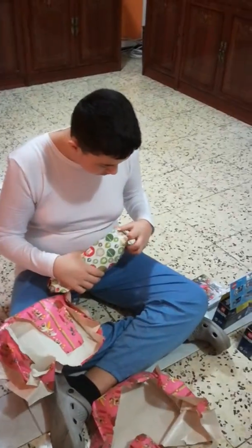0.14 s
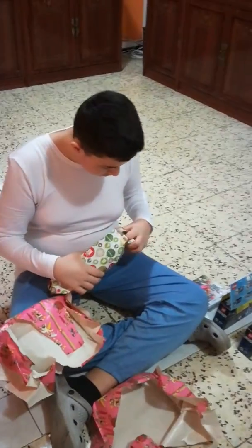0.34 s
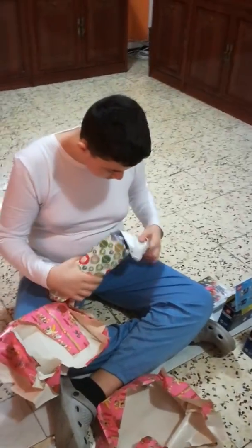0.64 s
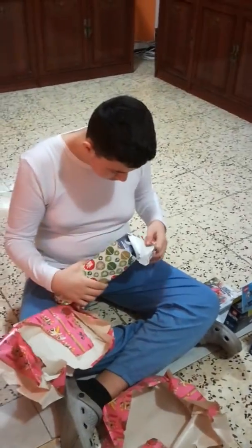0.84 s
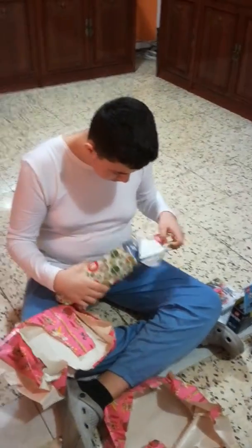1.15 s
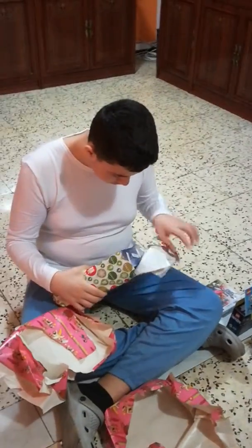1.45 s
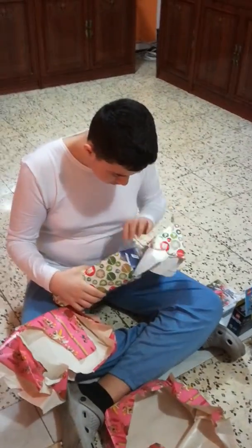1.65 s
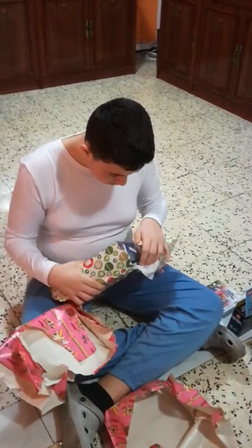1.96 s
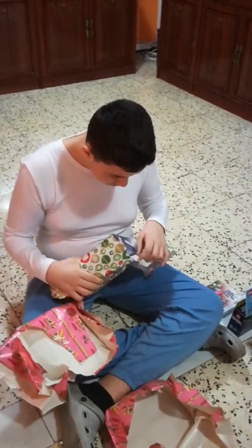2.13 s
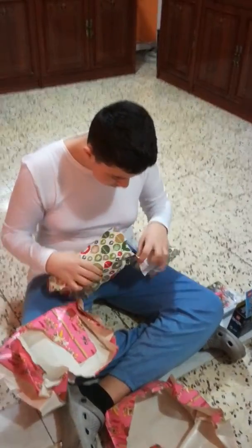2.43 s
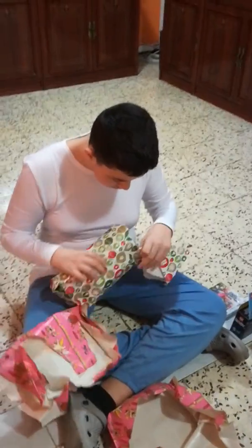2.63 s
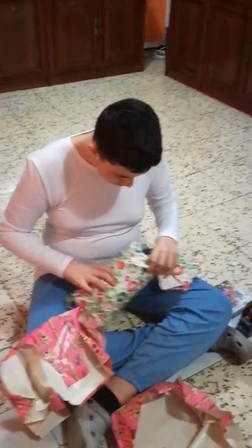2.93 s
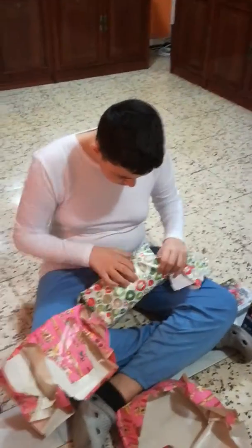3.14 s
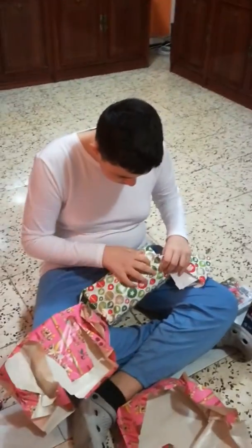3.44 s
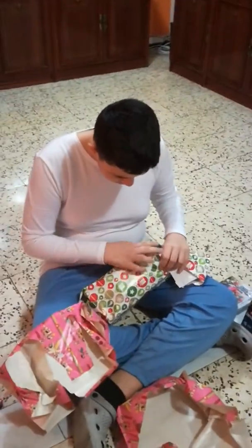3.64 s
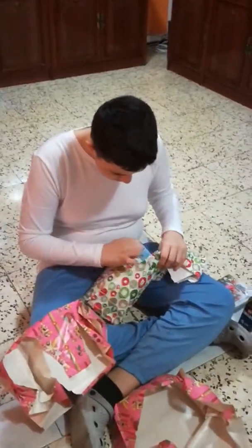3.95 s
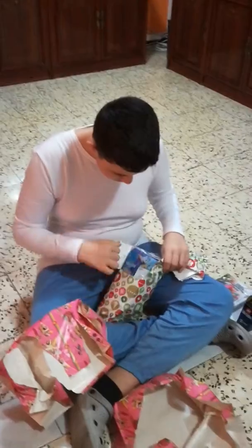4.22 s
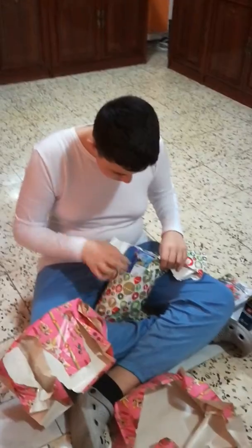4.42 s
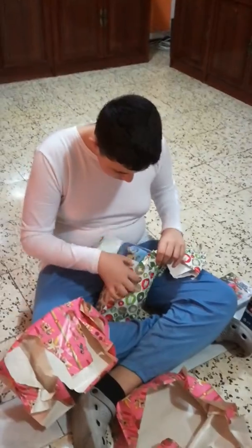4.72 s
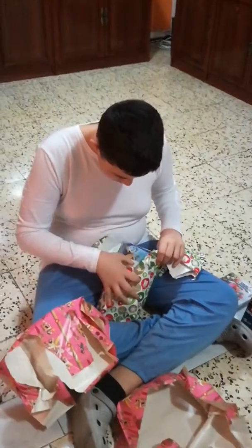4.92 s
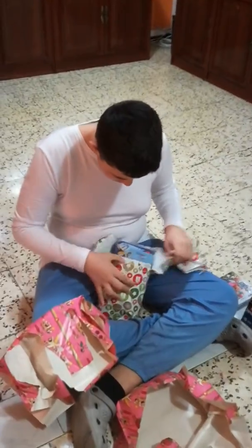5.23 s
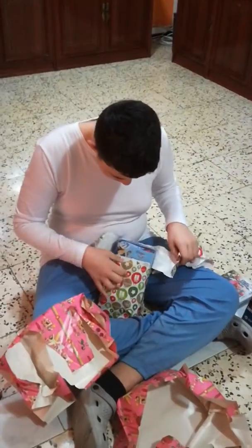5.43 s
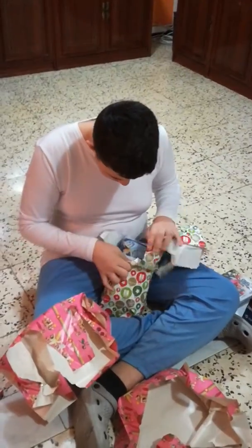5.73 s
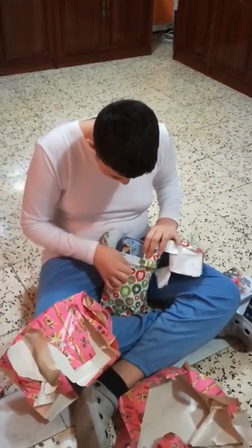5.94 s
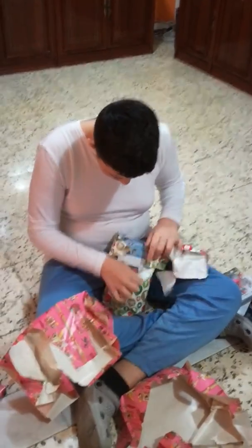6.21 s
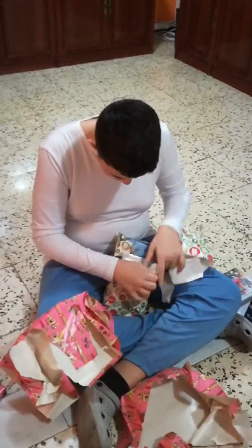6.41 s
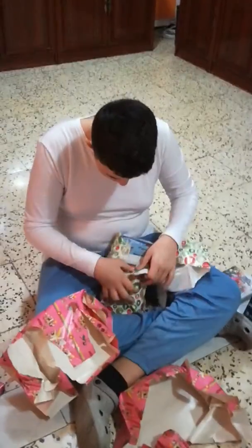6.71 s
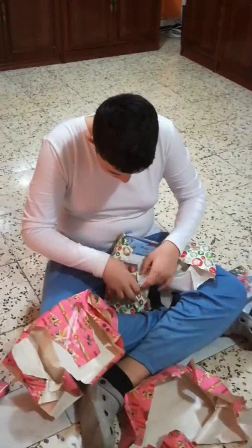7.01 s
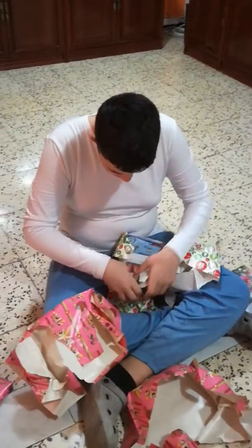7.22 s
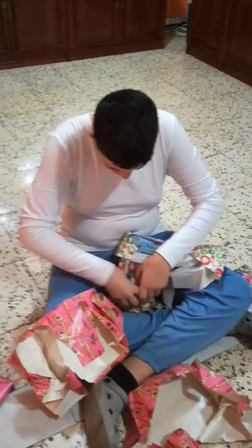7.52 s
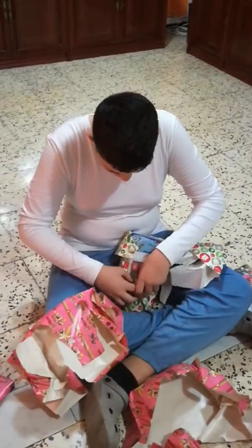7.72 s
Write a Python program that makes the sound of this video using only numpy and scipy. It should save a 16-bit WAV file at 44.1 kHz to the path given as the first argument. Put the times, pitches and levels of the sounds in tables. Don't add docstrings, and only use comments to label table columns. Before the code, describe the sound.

Glossy gift paper is opened by hand around a hollow carton, about a metre from a phone in a hard, tiled room. From 0 to 1.3 s, quick rips and squeezes give dense bright crackle, sharp fold snaps and dull creasing pops. After a brief dip near 1.5 s, moderate rustling continues, with crisp snaps around 2.4-2.6 s. It thins to small, papery, ringing pops near 3 s. At 3.6-4.0 s comes the loudest tearing and crumpling, with a hollow box rub and a soft low shift. Near-silence follows until 4.45 s, then a strong crumple around 4.9-5.2 s. Smaller picks and squeezes follow at 5.6-6.3 s and 6.7 s, a faint finger hiss near 6.9 s, a snap at 7.25 s, and a last cluster of popping folds around 7.75 s. Faint air hiss and hum remain beneath.

```python
import sys
import numpy as np
from scipy import signal
from scipy.fft import rfft, irfft, next_fast_len
from scipy.io import wavfile
from scipy.ndimage import map_coordinates

SR = 44100
rng = np.random.default_rng(int(sys.argv[2]) if len(sys.argv) > 2 else 0)


def elevation(decibels):
    levels = np.asarray(decibels, float)
    return 10 ** (levels / 20)


def output_pcm(signal):
    pcm = np.clip(np.atleast_2d(signal).T, -1, 1) * 32767
    wavfile.write(sys.argv[1], SR, np.round(pcm).astype(np.int16))


N = 346626

# frequency in Hz, density in dB per Hz.
AIR_SPECTRUM = [(20, -15), (50, -22), (120, -17), (260, -14.5), (520, -20.5), (850, -17), (3600, -19.5),
                (9000, -36.5), (16400, -43)]
# frequency in Hz, level in dB rms.
HUM_PARTIALS = [(100, -81.5), (197, -93), (297, -101)]
# frequency in Hz, T60 in seconds.
ROOM_T60 = [(200, 0.33), (1500, 0.46), (5000, 0.36), (14000, 0.074)]
# frequency in Hz, correlation from -1 to 1.
PORT_LIKENESS = [(80, 0.95), (290, 0.93), (640, -0.2), (1410, 0.32), (3100, 0.22), (6820, 0.29),
                 (15000, -0.26)]
# frequency in Hz, left lead in radians.
PORT_LEAD = [(300, 5.1), (600, 2.03), (1400, 7.67), (16000, 9.1)]
# frequency in Hz, left over right in dB.
PORT_BALANCE = [(100, 0), (380, .5), (700, 1), (1290, -4.5), (2380, -1.0), (4400, -3.5), (8120, -3.5),
                (15000, 6)]
# time in seconds, hold in seconds, level in dB.
SHIFTS = [
    (1.32, 0.034, -72),
    (3.94, 0.098, -65.5),
    (7.25, 0.058, -70),
]
# frequency in Hz, width in Hz, level in dB.
BOX_MODES = [
    (197, 185, -20),
    (307.3, 149, 1),
    (354, 1200, -18),
]
# full push in seconds, hold in seconds, drone in dB, rise in dB per s.
PRESSES = [(0.066, 0.22, -67.5, 98), (0.419, 0.017, -53, 59), (1.02, 0.28, -56, 90),
           (1.576, 0.52, -64.5, 587), (2.09, 0.13, -66, 61), (2.65, 0.024, -62, 76), (3.152, .03, -69, 64),
           (3.712, 0.022, -64, 113), (3.852, 0.14, -52, 138), (4.463, 0.24, -63.5, 600),
           (4.757, 0.0088, -54, 504), (4.999, 0.29, -50, 150), (5.632, 0.02, -60.5, 489),
           (5.93, 0.081, -54, 221), (6.244, 0.04, -57.5, 198), (6.48, 0.065, -70, 100),
           (6.738, 0.22, -55, 109), (7.242, 0.16, -52.5, 300), (7.526, 0.27, -62, 100)]
# time in seconds, level in dB.
SLIDE_LEVEL = [
    (5.9, -88),
    (6.9, -66),
    (7.17, -73),
    (7.3, -87),
]
# time in seconds, level under SLACK_HZ in dB.
SLACK = [(0, -27), (.3, -2), (.9, 0.5), (1.57, 1.5), (1.75, -1.5), (2.1, 1.5), (2.3, -0.5), (3.0, -1.5),
         (3.45, 9), (3.53, -2), (3.65, -4), (4.0, 4.5), (4.6, 7.5), (5.0, 0), (5.4, 3), (6.0, 7.5),
         (6.25, -1.5), (6.6, 0), (6.8, 9), (7.75, 2.5), (7.86, -2)]
# start in seconds, hold in seconds, strength in dB,
# dull creases over bright fibres in dB, fall in dB per s.
RIPS = [(0, 0.01, -42, -1, 33), (0.235, 0.036, -38.5, 0, 120), (0.797, 0.013, -43, 4, 162),
        (1.199, 0.025, -39.5, 1, 106), (1.681, 0.32, -45.5, 0.5, 108), (1.938, 0.4, -47.5, 3, 140),
        (2.416, 0.033, -42, -6.5, 112), (3.26, 0.094, -49, 1, 107), (3.615, 0.0038, -33.5, -1, 220),
        (3.802, 0.0089, -31.5, -1, 139), (4.556, 0.023, -42, -2.5, 148), (4.901, 0.31, -35, -0.5, 112),
        (5.346, 0.021, -49, 4.5, 105), (5.623, 0.037, -40.5, -12, 168), (5.859, 0.081, -43.5, -27, 64),
        (6.23, 0.14, -49, 3, 135), (6.637, 0.011, -41, -3.5, 123), (7.259, 0.056, -40.5, -1.5, 89)]
# full grip in seconds, hold in seconds, strength in dB,
# dull creases over bright fibres in dB, fall in dB per s.
SQUEEZES = [(0.382, 0.012, -32.5, 0, 109.5), (0.969, 0.12, -37.5, 1, 69), (1.315, 0.11, -49, -0.5, 286),
            (2.56, 0.1, -43, 2.5, 98), (2.818, 0.12, -50.5, 2.5, 400), (3.673, 0.028, -36, 0, 176),
            (3.902, 0.09, -34.5, -3, 183), (5.938, 0.095, -41, -1.5, 154), (6.133, 0.078, -52, 4, 150),
            (6.744, 0.094, -45.5, -3.5, 112), (7.633, 0.079, -47.5, -6, 146), (7.858, 0.018, -44, 2, 158)]
# time in seconds, strength in dB, dull creases over bright fibres in dB.
TWITCHES = [(0.189, -44, 2.5), (5.316, -56, 7), (0.723, -53.5, 7.5), (1.625, -56, 5), (2.376, -58, 7),
            (3.041, -60, 10), (3.1, -65, 3), (3.197, -60.5, 2), (4.459, -54, 4), (4.852, -45.5, -4),
            (6.465, -68.5, 16.5), (6.513, -53.5, 7), (7.053, -68, 14), (7.19, -54.5, 2.5),
            (7.22, -43.5, -21), (7.531, -52.5, 3), (4.447, -59, 3)]
# time in seconds, peak in dB, pitch in
# Hz, bright crack in dB.
FOLDS = [(.0635, -33, 5860, -9), (.1385, -35, 6800, -9), (.2472, -24, 3100, -10),
         (.3464, -30, 3450, -13), (.6138, -38, 6720, -9), (.723, -44, 4130, -11),
         (.7942, -36, 2240, -18), (.801, -30, 2170, -14), (.8804, -31, 5680, -4),
         (.922, -35, 2580, -14), (1.1737, -32, 2070, -13), (1.2026, -29, 6000, -8),
         (1.2181, -24, 2250, -5), (1.3646, -32, 5680, -6), (1.4109, -36, 6030, -16),
         (1.58, -53, 1120, -20), (1.6275, -47, 2330, -11), (1.6775, -30, 2410, -12),
         (1.841, -34, 2670, -13), (1.9404, -33, 5600, -5), (2.0476, -35, 2150, -13),
         (2.2177, -36, 3100, -14), (2.2713, -38, 7410, -3), (2.3175, -38, 5770, -18),
         (2.3766, -36, 4220, -6), (2.4263, -37, 6290, -8), (2.4366, -23, 5680, -8),
         (2.5518, -30, 6030, -6), (2.6302, -25, 5510, -9), (2.7222, -34, 7490, -12),
         (2.7952, -38, 1810, -8), (2.9091, -39, 1640, -5), (3.0432, -45, 1980, -15),
              (3.1945, -51, 1290, -7), (3.2196, -47, 1720, -12), (3.2541, -43, 1810, -11),
              (3.2676, -35, 1720, -8), (3.3022, -36, 2070, -17), (3.3374, -34, 2410, -15),
              (3.3951, -41, 2330, -15), (3.4317, -43, 2330, -10), (3.4677, -45, 2150, -12),
              (3.4833, -36, 1550, -7), (3.5591, -38, 1460, -24), (3.5942, -36, 1640, -21),
              (3.6111, -25, 6030, -8), (3.6599, -25, 1950, -13), (3.6987, -26, 5680, -13),
              (3.7533, -30, 4910, -9), (3.8044, -24, 3270, -12), (3.9139, -26, 3530, -13),
              (4.4594, -35, 8400, -4), (4.5193, -41, 5200, -9), (4.5457, -35, 3270, -8),
              (4.5531, -37, 5250, -6), (4.6019, -36, 2500, -14), (4.8241, -42, 6030, -13),
              (4.8672, -36, 2500, -7), (4.897, -28, 2500, -9), (4.9236, -27, 5600, -6),
         (5.0612, -28, 2500, -9), (5.1951, -29, 6800, -8), (5.3168, -38, 5000, -7),
              (5.3445, -34, 4310, -12), (5.629, -33, 6720, -9), (5.8465, -35, 5510, -7),
              (5.8715, -36, 5080, -12), (6.1248, -37, 2500, -11), (6.1494, -38, 2410, -15),
              (6.2335, -34, 6200, -15), (6.4626, -45, 1810, -23), (6.4757, -44, 6120, -10),
              (6.5211, -34, 6720, -5), (6.6236, -39, 1890, -10), (6.6438, -34, 5680, -9),
              (6.7621, -32, 6030, -13), (6.8074, -31, 6030, -7), (7.0605, -44, 6120, -14),
              (7.1907, -45, 3880, -16), (7.2206, -32, 3960, -11), (7.2442, -28, 6290, -8),
              (7.36, -32, 2500, -8), (7.455, -38, 5510, -9), (7.633, -38, 5600, -3),
              (7.6932, -35, 2600, -12), (7.7386, -26, 2330, -20), (7.752, -22, 2450, -28),
              (7.7715, -29, 2900, -26), (7.7893, -33, 2900, -8), (7.8398, -35, 2840, -5)]
# time in seconds, peak in dB, pitch in Hz.
TICKS = [(0.0083, -32, 5300), (0.0174, -31, 6120), (0.0315, -33, 4910), (0.0693, -34, 5640),
         (0.0967, -36, 5680), (0.1902, -35, 6030), (0.227, -35, 3880), (0.2621, -31, 4910),
         (0.3029, -33, 2930), (0.3181, -32, 6800), (0.3269, -33, 6680), (0.4117, -26, 2020),
         (0.468, -30, 1940), (0.4836, -31, 3700), (0.5102, -34, 2670), (0.706, -47, 3230),
         (0.8997, -35, 2760), (0.9538, -34, 3190), (0.993, -31, 1210), (1.0211, -27, 5990),
         (1.0368, -29, 4090), (1.2244, -30, 2070), (1.3019, -35, 2890), (1.5277, -53, 3570),
         (1.6031, -49, 3960), (1.6716, -44, 2500), (1.6952, -36, 5730), (1.7293, -37, 2410),
         (1.7433, -38, 5250), (1.768, -36, 3530), (1.7864, -36, 3830), (1.8703, -38, 2710),
         (1.9086, -40, 2840), (1.9174, -41, 5860), (1.9495, -36, 5600), (1.9939, -36, 4350),
         (2.0266, -36, 5560), (2.0679, -37, 1810), (2.12, -40, 2540), (2.1349, -41, 3490),
         (2.1529, -41, 4390), (2.2021, -42, 4350), (2.2403, -41, 3790), (2.3265, -41, 6120),
         (2.3855, -40, 3960), (2.4057, -40, 3660), (2.446, -33, 3450), (2.5084, -38, 3140),
         (2.5307, -38, 4180), (2.5466, -31, 5810),
         (2.5803, -32, 1850), (2.6095, -33, 1770), (2.6384, -32, 2370), (2.6944, -37, 2330),
              (2.8914, -42, 1770), (3.0667, -46, 1640), (3.1216, -49, 1640), (3.2767, -40, 2150),
              (3.4028, -46, 2110), (3.4464, -47, 2240), (3.4895, -45, 1640), (3.5204, -47, 1640),
              (3.5512, -46, 1640), (3.5821, -44, 5380), (3.6179, -28, 6720), (3.6248, -29, 6290),
              (3.6685, -24, 1950), (3.6805, -27, 5510), (3.7591, -30, 5940), (3.8103, -25, 3400),
              (3.8848, -28, 2840), (3.9199, -27, 2800), (3.9488, -29, 5040), (3.9741, -27, 3830),
              (3.9827, -26, 5470), (3.9941, -28, 4740), (4.0018, -29, 5120), (4.1253, -44, 2370),
              (4.1914, -51, 2450), (4.3791, -60, 2710), (4.4464, -53, 2540), (4.4689, -43, 8350),
              (4.5065, -38, 5990), (4.581, -35, 3400), (4.6137, -38, 2500), (4.6374, -37, 6370),
              (4.6447, -41, 4260), (4.663, -42, 2540), (4.7594, -50, 1290), (4.8111, -54, 5990),
              (4.8513, -43, 6200), (4.8886, -32, 5810), (4.9062, -29, 2150), (4.9433, -29, 7490),
              (4.9553, -27, 3060), (4.9762, -28, 3880), (5.0464, -28, 3790), (5.0899, -29, 5640),
              (5.117, -28, 6500), (5.1769, -33, 5940),
         (5.2839, -40, 1210), (5.358, -38, 5510), (5.5384, -49, 4910), (5.6209, -39, 6330),
              (5.7331, -41, 5470), (5.8193, -49, 5210), (5.8541, -37, 5300), (5.8812, -35, 5430),
              (5.8916, -35, 5510), (5.9111, -33, 3530), (5.9303, -31, 3790), (5.9417, -32, 4950),
              (5.9775, -33, 4570), (5.9862, -31, 4950), (6.0005, -30, 4440), (6.008, -31, 4440),
              (6.1049, -40, 1420), (6.18, -39, 2370), (6.2096, -39, 2500), (6.2247, -39, 4610),
              (6.2439, -35, 4260), (6.2559, -36, 6290), (6.2961, -39, 5860), (6.3059, -40, 5680),
              (6.3615, -42, 2330), (6.3669, -41, 5120), (6.4848, -46, 2070), (6.5088, -42, 5860),
              (6.5287, -36, 2580), (6.6331, -38, 2070), (6.693, -36, 6550), (6.7367, -35, 4480),
              (6.7859, -36, 6160), (6.8181, -33, 3620), (6.8961, -37, 6160), (6.944, -44, 1250),
              (7.1788, -47, 3270), (7.228, -36, 4130), (7.2381, -34, 5470), (7.2534, -32, 5990),
              (7.2591, -30, 6420), (7.3676, -35, 6070), (7.4048, -38, 6120), (7.5331, -43, 7800),
              (7.5491, -42, 4050), (7.5892, -42, 7020), (7.6154, -39, 6160), (7.6589, -37, 6290),
              (7.7633, -36, 2020), (7.8566, -28, 2120)]
# frequency in Hz, density in dB per Hz.
CREASE_SPECTRUM = [(260, 0.5), (480, -9.5), (700, -4), (1560, -2.5), (3800, -3), (4940, -9.5), (8360, -120)]
FIBRE_SPECTRUM = [(1940, -11.5), (3300, -8.5), (6120, -1.5), (9720, -14.5), (15900, -19), (16400, -103)]
# time in seconds, pitch in Hz, ring 0
PANEL = [(0, 2400, 0.49), (1.5, 2130, 0.25), (1.7, 2770, 0.6), (1.9, 2630, 0.3), (2.05, 1910, 0.54),
         (2.3, 2660, 0.12), (2.6, 1950, 0.52), (2.75, 2060, 0.69), (3.05, 2060, 0.53), (3.2, 1580, 0.7),
         (3.27, 2510, 0.94), (3.46, 2390, 1), (3.48, 1790, 0.8), (3.59, 1850, 0.96), (3.72, 2130, 0.7),
         (3.8, 2090, 0.37),
         (3.95, 2900, 0.07), (4.2, 2780, 0.44), (4.9, 2240, 0.13), (5.6, 2430, 0.16),
              (5.84, 4070, 0.4), (6.0, 3350, 0.5), (6.1, 2460, 0.3), (6.6, 2300, 0.53), (6.8, 3350, 0.62),
              (7.0, 2250, 0.3), (7.2, 4000, 0.65), (7.4, 3250, 0.36), (7.55, 2240, 0.15), (7.7, 2440, 0.53),
              (7.75, 2830, 0.4), (7.86, 2700, 0.4)]

SLACK_HZ = 1040
PRESS_SAG_DB_S, PRESS_FALL_DB_S = 20.6, 124
RIP_RISE_DB_S, RIP_SAG_DB_S = 3500, 16.6
GRIP_RISE_DB_S, GRIP_SAG_DB_S = 187, 4.2
TWITCH_HOLD_S, TWITCH_FALL_DB_S = 0.018, 81


def unit(x):
    return x / np.sqrt(np.mean(x ** 2) + 1e-20)


def along(points, hz):
    f, v = np.transpose(points)
    return np.interp(np.log(hz + 1), np.log(f + 1), v)


def curves(rows):
    s, *cols = np.transpose(rows)
    return [np.interp(np.arange(N) / SR, s, c) for c in cols]


def wobble(rate_hz):
    return map_coordinates(rng.standard_normal(N // 100), [np.arange(N) * rate_hz / SR])


def filtered(x, response):
    m = next_fast_len(N + 8192)
    return irfft(rfft(x, m) * response(np.fft.rfftfreq(m, 1 / SR)), m)[..., :N]


def coloured(x, spectrum):
    f, own = signal.welch(x.sum(axis=0), SR, nperseg=128)
    floor = 1e-6 * own.max()
    return unit(filtered(x, lambda hz: elevation(along(spectrum, hz)) / np.sqrt(np.interp(hz, f, own) + floor)))


def diffuse(pair):
    m = pair.shape[1]
    likeness = along(PORT_LIKENESS, np.fft.rfftfreq(m, 1 / SR))
    turn = np.arccos(np.clip(likeness, -1, 1)) / 2
    mid, side = irfft(rfft(pair) * [np.cos(turn), np.sin(turn)], m)
    return np.array([mid + side, mid - side])


def pops(s, gain, hz, cycles, pan_db, lag_s, size):
    out, k = np.zeros((2, N + size)), np.arange(size)
    start = np.clip(np.round(s * SR), 0, N - 1).astype(int)
    for side, sign in enumerate((1, -1)):
        delay_s = lag_s[:, None] * (sign + 1) / 2
        turns = np.maximum(k / SR - delay_s, 0) * hz[:, None]
        wave = np.sin(2 * np.pi * turns) * np.exp(-turns / cycles[:, None])
        wave *= (gain * elevation(sign * pan_db / 2))[:, None]
        out[side] = np.bincount((start[:, None] + k).ravel(), wave.ravel(), N + size)
    return out[:, :N]


def strokes(s, hold_s, db, rise, sag, fall):
    step = np.arange(0, N + 64, 64)
    t = step[:, None] / SR - s
    held = np.clip(t, 0, np.abs(hold_s))
    level_db = db + rise * np.minimum(t, 0) - sag * held - fall * (np.maximum(t, 0) - held)
    power = np.sum(elevation(2 * np.maximum(level_db, -120)), axis=1)
    return np.interp(np.arange(N), step, power)


def quiet():
    t = np.arange(N) / SR
    hum = np.zeros(N)
    for hz, db in HUM_PARTIALS:
        level = elevation(db + 3.0 + 0.95 * wobble(1.54))
        hum += level * np.sin(2 * np.pi * hz * t + 0.2 * wobble(3.5))
    air = diffuse(coloured(rng.standard_normal((2, N)), AIR_SPECTRUM))
    return elevation(-70.0) * air + hum


def room(x, near_db, near_t60_s):
    wet, step, mono = np.zeros((2, N + SR)), SR // 5, x.mean(axis=0)
    for start in range(0, N, step):
        hz, t, z = signal.stft(rng.standard_normal((2, SR // 2)), SR, nperseg=128)
        walls = elevation(-60 * t / along(ROOM_T60, hz)[:, None])
        near = elevation(near_db - 60 * t / near_t60_s)
        tail = diffuse(signal.istft(z * (walls + near), SR, nperseg=128)[1])
        tail = tail / np.linalg.norm(tail[0])
        part = signal.fftconvolve(mono[None, start:start + step], tail, axes=1)
        wet[:, start + 60:][:, :part.shape[1]] += part
    return wet[:, :N]


def lap():
    s, hold_s, db = np.transpose(SHIFTS)
    deep = lambda hz: 1 / (1 + ((hz - 135) / 55) ** 4)
    power = strokes(s, hold_s, db, PRESS_FALL_DB_S * 2, PRESS_SAG_DB_S, PRESS_FALL_DB_S * 2)
    return np.sqrt(power) * unit(filtered(rng.standard_normal(N), deep))


def box():
    power = strokes(*np.transpose(PRESSES), PRESS_SAG_DB_S, PRESS_FALL_DB_S)
    modes = lambda f: sum(elevation(db) * 1j * f * w / (c * c - f * f + 1j * f * w) for c, w, db in BOX_MODES)
    rub = rng.standard_normal((2, N)) * elevation(1.8 * wobble(25))
    return np.sqrt(power) * unit(diffuse(filtered(rub, lambda f: modes(f) ** 2)))


def slide():
    band = lambda hz: 1 / (1 + ((hz - 3460) / 220) ** 4)
    level = elevation(curves(SLIDE_LEVEL)[0] + 2.7 * wobble(31))
    return level * unit(filtered(rng.standard_normal((2, N)), band))


def hands():
    rows = [(*row, RIP_RISE_DB_S, RIP_SAG_DB_S) for row in RIPS]
    rows += [(*row, GRIP_RISE_DB_S, GRIP_SAG_DB_S) for row in SQUEEZES]
    rows += [(s, TWITCH_HOLD_S, db, dull_db, TWITCH_FALL_DB_S, RIP_RISE_DB_S, RIP_SAG_DB_S)
             for s, db, dull_db in TWITCHES]
    s, hold_s, db, dull_db, fall, rise, sag = np.transpose(rows)
    return 10 * np.log10([strokes(s, hold_s, level, rise, sag, fall) for level in (db + dull_db, db)])


def flap():
    low = lambda hz: 1 / (1 + (hz / SLACK_HZ) ** 6) / (1 + (420 / (hz + 1)) ** 4)
    flutter = coloured(rng.standard_normal((2, N)), CREASE_SPECTRUM) * elevation(3.6 * wobble(60))
    return elevation(hands()[0] + curves(SLACK)[0] - 8.0) * diffuse(filtered(flutter, low))


def folds():
    tick_db, tick_crack_db, tick_ring = -2.5, -12, 0.6
    snaps = [(*row, 1) for row in FOLDS]
    snaps += [(s, db + tick_db, hz, tick_crack_db + 5 * np.log2(hz / 5000), tick_ring)
              for s, db, hz in TICKS]
    s, db, hz, crack_db, ring = np.transpose(snaps)
    draw = rng.standard_normal((len(s), 3))
    lag_s, pan_db = 0.00007 * np.abs(draw[:, 0]), 2.4 * draw[:, 1]
    life = 3.5 * ring * (hz / 3000) ** 0.86
    panel = pops(s, elevation(db + 0.5), hz, life, pan_db, lag_s, size=200)
    spike_hz = 5200 * np.exp(0.25 * draw[:, 2])
    spike = pops(s, elevation(db + crack_db / 3 + 4), spike_hz, np.full(len(s), 0.8), pan_db, lag_s, size=40)

    s, db, hz, crack_db, lag_s, pan_db = np.repeat([s, db, hz, crack_db, lag_s, pan_db], 5, axis=1)
    draw, one = rng.standard_normal((len(s), 3)), np.ones(len(s))
    late_s = np.tile(np.arange(5), len(snaps)) * 0.0004 * np.exp(0.33 * draw[:, 0])
    fade = elevation(db - 2200 * late_s)
    shiver_hz = np.clip(np.sqrt(hz * 4500) * np.exp(0.45 * draw[:, 1]), 1500, 8000)
    shiver = pops(s + late_s, fade * elevation(crack_db / 2 - 3.5), shiver_hz, 6.3 * one, pan_db, lag_s, size=96)
    crack_hz = np.clip(10500 * np.exp(0.4 * draw[:, 2]), 5000, SR / 2.5)
    crack = pops(s + late_s, fade * elevation(crack_db + 0.5), crack_hz, 8.2 * one, pan_db, lag_s, size=48)
    small = lambda f: 1 / (1 + (1050 / (f + 1)) ** 6)
    return filtered(panel + spike + shiver + crack, small)


def crackle(spectrum, centre_hz, spread, cycles, tail_db, clumps, count, size):
    draw, chance = rng.standard_normal((count, 4)), rng.random((count, 2))
    at = (chance[:, 0] * N).astype(int)
    pitch_hz = np.clip(centre_hz[at] * np.exp(spread[at] * draw[:, 0]), 300, SR / 2.5)
    gain = elevation(-tail_db * np.log(chance[:, 1] + 0.02))
    life = cycles[at] * np.exp(0.026 * draw[:, 1])
    pan_db, lag_s = 3 * draw[:, 2], 0.000294 * np.abs(draw[:, 3])
    grains = pops(at / SR, gain / np.sqrt(life), pitch_hz, life, pan_db, lag_s, size)
    return unit(coloured(grains, spectrum) * clumps)


def sheet():
    crease_db, fibre_db = hands()
    panel_hz, ring = curves(PANEL)
    ring, jerks, one = np.clip(ring, 0, 1), wobble(45), np.ones(N)
    creases = crackle(CREASE_SPECTRUM, panel_hz * 0.89, 0.62 - 0.517 * ring, 1.76 + 1.9 * ring,
                      tail_db=2.1, clumps=elevation(1.0 * jerks), count=7000, size=150)
    dull = filtered(creases, lambda hz: 1 / (1 + (hz / SLACK_HZ) ** 6))
    creases = creases + (elevation(curves(SLACK)[0] - 3) - 1) * dull
    fibres = crackle(FIBRE_SPECTRUM, 6600 * one, 0.6 * one, 1.06 * one,
                     tail_db=3.6, clumps=elevation(1.5 * jerks), count=15000, size=44)
    return elevation(crease_db - 4.5) * creases + elevation(fibre_db - 4) * fibres


def scene():
    thin = lambda hz: 1 / (1 + (380 / (hz + 1)) ** 4)
    lead = lambda hz: np.exp(0.5j * np.outer([1, -1], along(PORT_LEAD, hz)))
    bed, snaps = sheet(), folds()
    paper = filtered(bed + snaps + slide(), thin)
    direct = filtered(paper, lead)
    carton = box()
    to_room = paper - 0.25 * snaps + elevation(-8.0) * carton
    wet = elevation(-1.0) * room(to_room, near_db=3.5, near_t60_s=0.0063)
    return direct + carton + wet + quiet() + flap() + lap()


def top_cut(x):
    return signal.sosfilt(signal.butter(12, 16840, fs=SR, output="sos"), x)


def record(dry):
    top_hz, limit = 16300, 0.25
    balance = lambda hz: elevation(np.outer([0.5, -0.5], along(PORT_BALANCE, hz))) * (hz < top_hz)
    ports = filtered(dry, balance)
    ports = ports / (1 + np.abs(ports / limit) ** 4) ** 0.25
    return top_cut(ports)


dry = scene()
out = record(dry)
output_pcm(out)
```